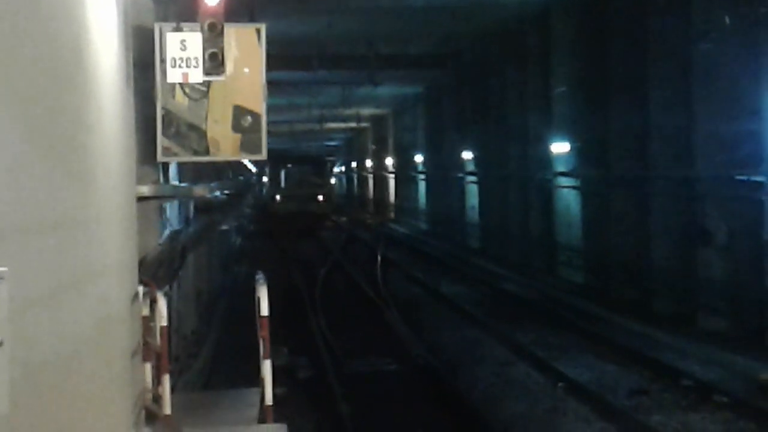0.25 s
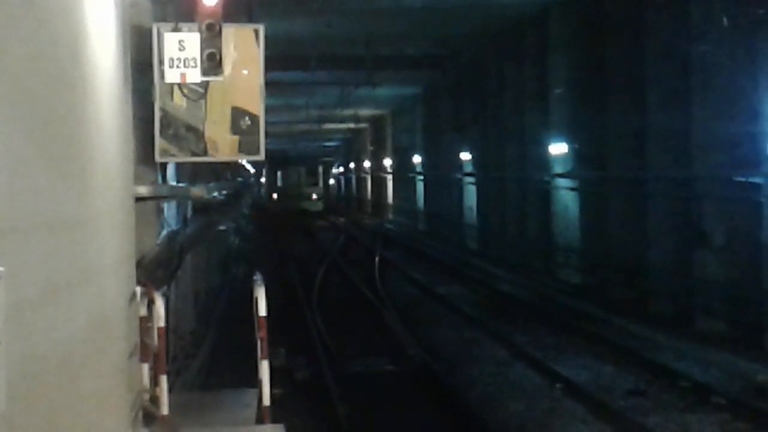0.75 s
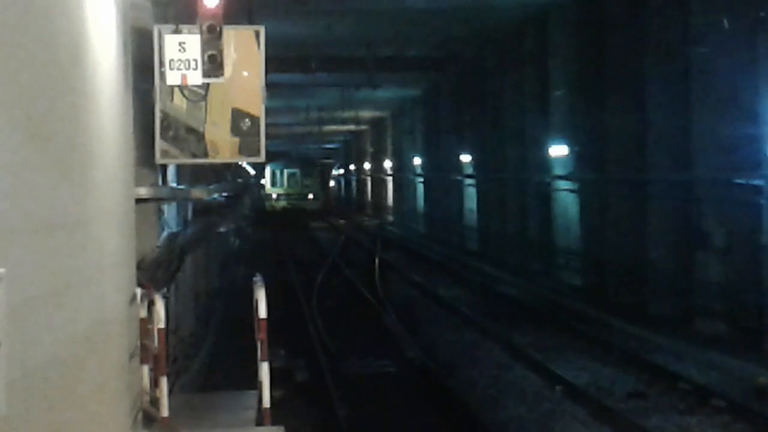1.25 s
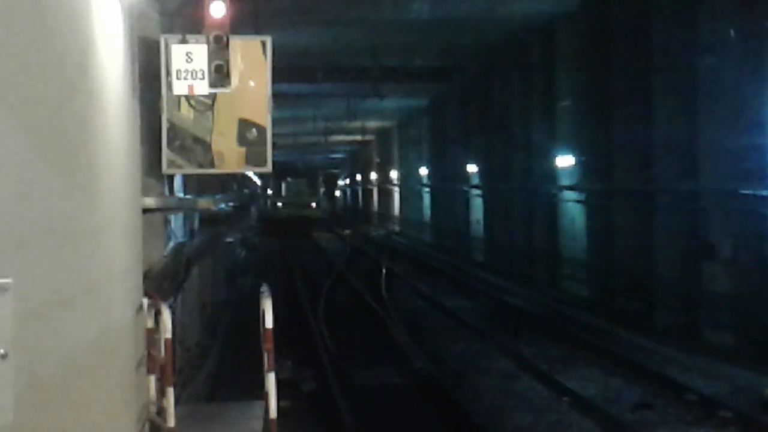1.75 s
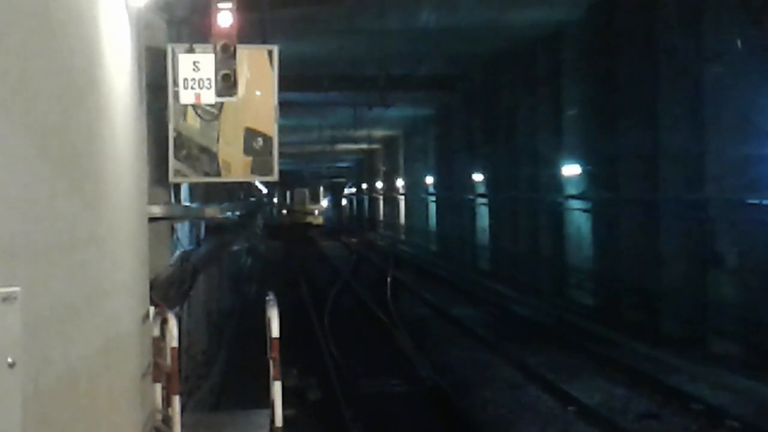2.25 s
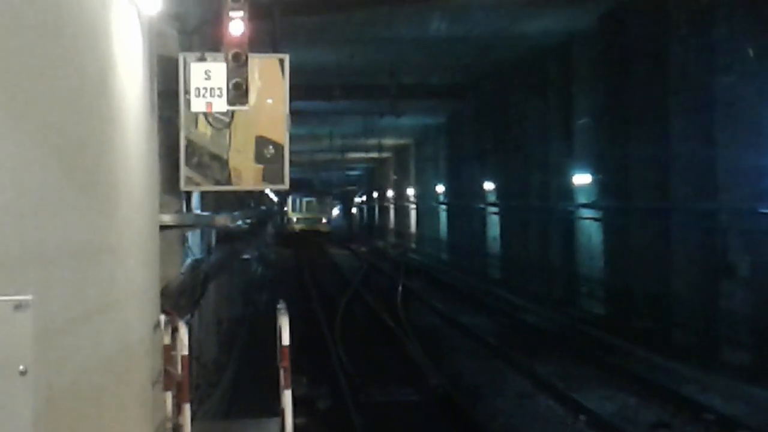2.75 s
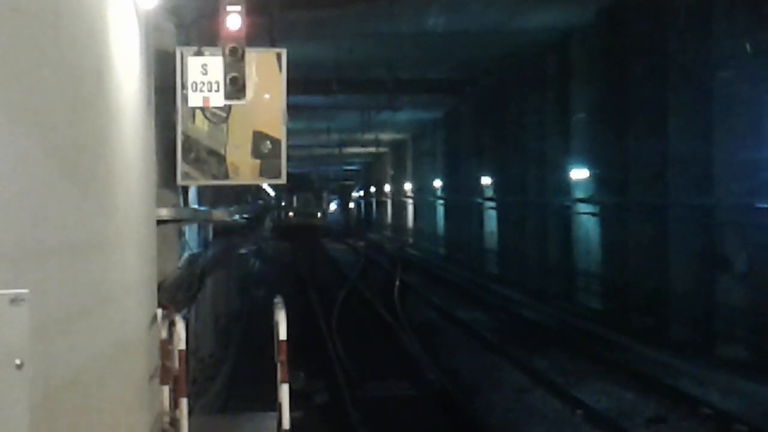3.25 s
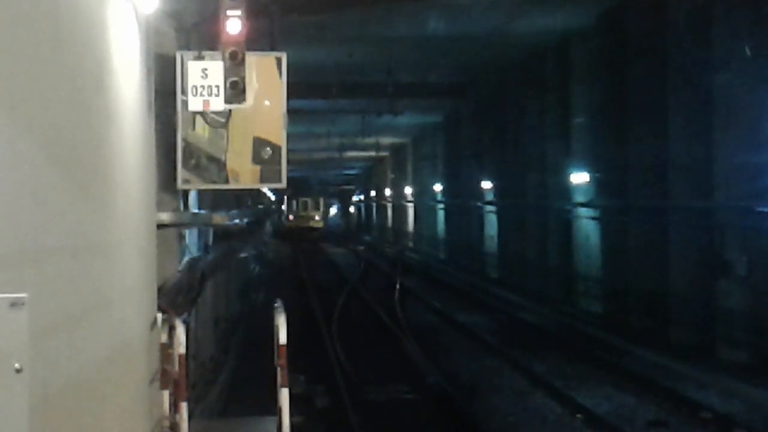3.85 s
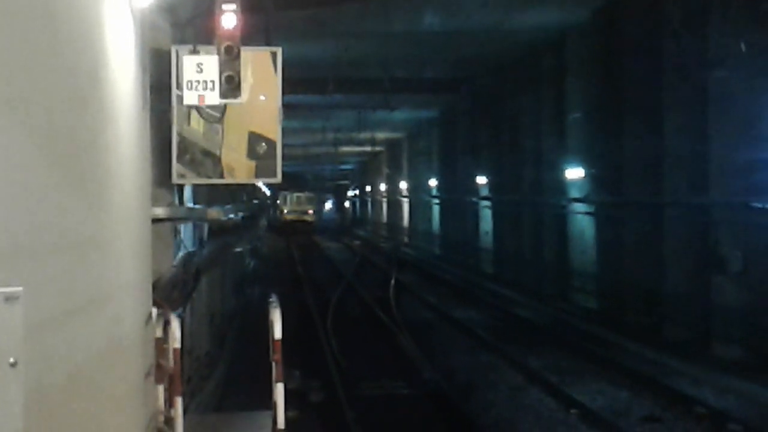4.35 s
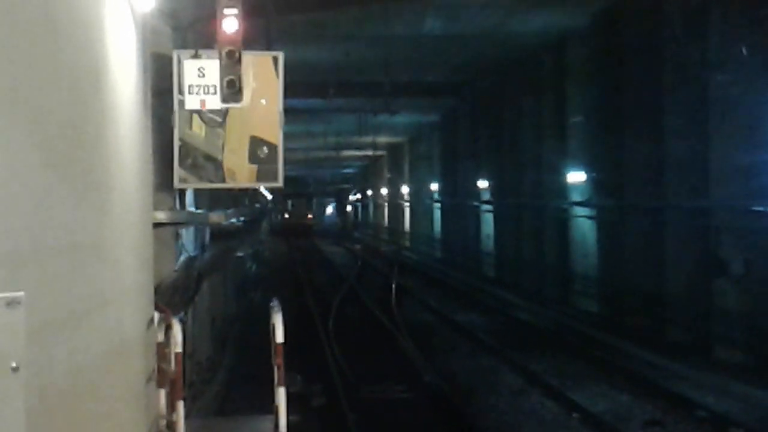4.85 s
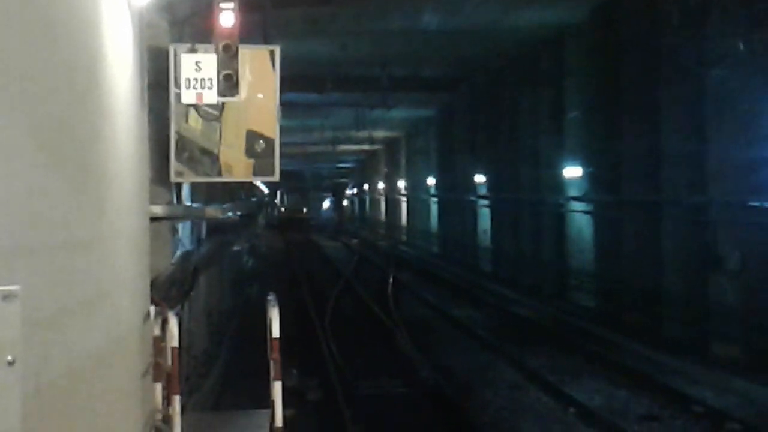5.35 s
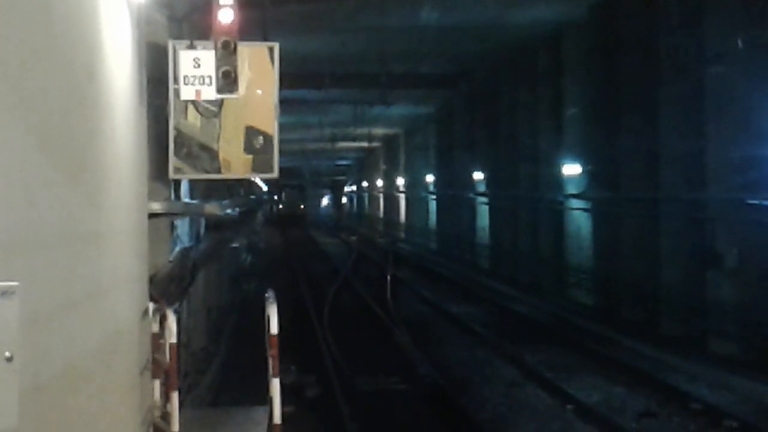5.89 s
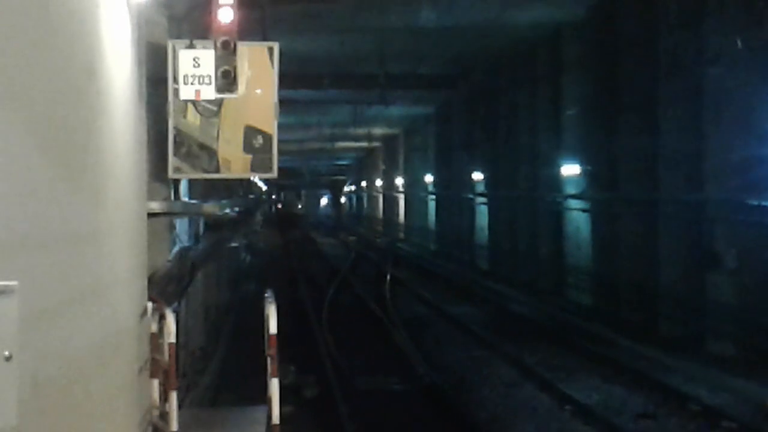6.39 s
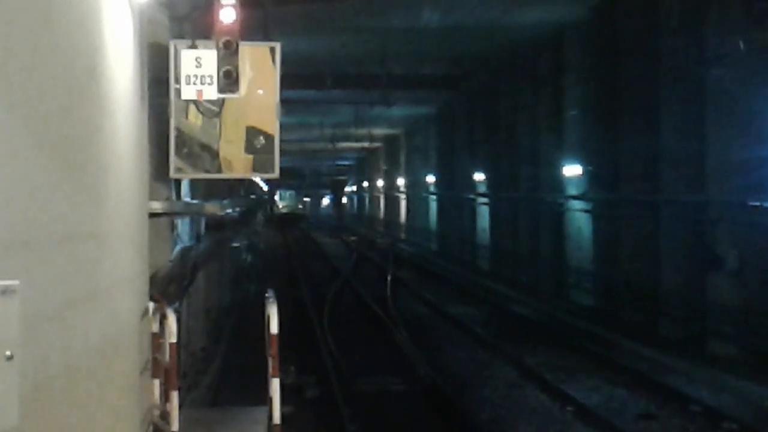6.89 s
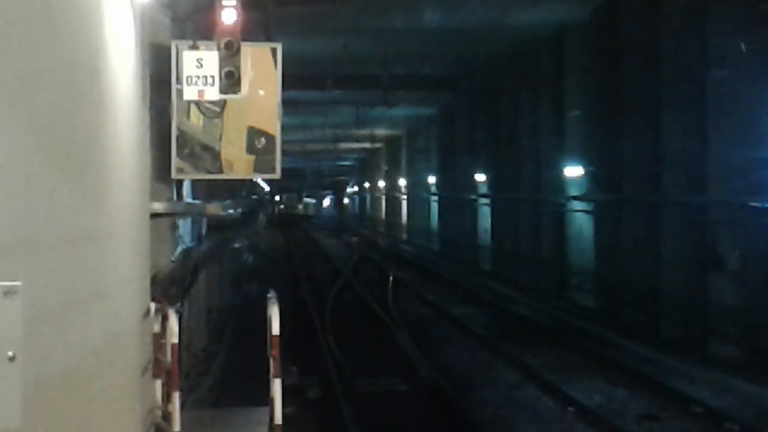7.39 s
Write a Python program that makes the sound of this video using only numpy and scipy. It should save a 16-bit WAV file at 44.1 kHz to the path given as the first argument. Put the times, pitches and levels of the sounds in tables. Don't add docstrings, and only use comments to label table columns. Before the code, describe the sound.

Departing metro train heard from the platform end: deep rolling rumble, early joint thuds, later swells over points, gradually receding into the tunnel.

```python
import sys
import numpy as np
from scipy import signal
from scipy.fft import rfft, irfft, next_fast_len
from scipy.io import wavfile
from scipy.ndimage import uniform_filter1d, map_coordinates

SR = 44100
rng = np.random.default_rng(int(sys.argv[2]) if len(sys.argv) > 2 else 0)


def unload_wav(signal):
    wavfile.write(
        sys.argv[1],
        SR,
        np.round(np.clip(np.atleast_2d(signal).T, -1, 1) * 32767).astype(np.int16),
    )


def natural_amplitude(level_db):
    exponent = np.asarray(level_db, float) / 20
    return 10 ** exponent


N = 336302

# frequency in Hz, level in dB.
VENTILATION_SPECTRUM = [(12, -45.5), (20, -18), (38, -17), (102, 2.5), (168, -12), (221, 0.5), (259, -6),
                        (446, -11), (964, -31.5), (1160, -32), (4500, -51), (5850, -90.5), (9900, -120)]
# frequency in Hz, level in dB.
GROUND_SPECTRUM = [(8.8, -51), (15, -21), (48, -6), (75, -6.5), (98, -24), (160, -120)]
# frequency in Hz, level in dB.
HISS_SPECTRUM = [(2000, -23), (3500, -13.5), (4600, -4.5), (5500, -4), (6500, -2), (7700, 1), (11000, 0.5),
                 (15000, 1)]
# frequency in Hz, level in dB.
WHINE_TONES = [(14002, -90.5)]
# frequency in Hz, width in Hz, level in dB.
FLOOR_MODES = [(86.2, 18, -6), (99, 16, -10.5), (116, 17, 2)]
# frequency in Hz, width in Hz, level in dB.
BOGIE_MODES = [(137.1, 14, -1), (159, 17.6, 0.5), (176.6, 20, -4.5), (200, 20.5, -2.5)]
# frequency in Hz, width in Hz, level in dB.
RAIL_MODES = [(217.8, 15, -0.5), (241.2, 24, -1.5), (275.5, 24, -4), (296, 20, -3.5)]
# frequency in Hz, width in Hz, level in dB.
WHEEL_MODES = [(350.6, 78, 1), (423.4, 89, -0.5), (520.4, 117, -3), (579, 33, -10.5)]
# modes (frequency in Hz, width in Hz, level in dB),
# level in dB, fall in dB per s.
NEAR_RAIL = ([(246.2, 10, 0)], -32.5, 6)
# frequency in Hz, level in dB.
ROAR_SPECTRUM = [(360, -27.5), (620, -0.5), (735, -1.5), (852, -5.5), (911, -9), (1030, -10.5),
                 (1220, -20.5), (1500, -26.5), (1950, -53), (3300, -120)]
# frequency in Hz, level in dB.
RUSH_SPECTRUM = [(760, -31), (1300, -2), (1710, -4), (1880, -3.5), (3600, -24), (4680, -56), (7920, -120)]
# centre in seconds, half length in seconds, swell in dB, centre in Hz.
POINTS_SWELLS = [(0.264, 0.054, 5.5, 252), (0.3, 0.17, 2, 400), (0.53, 0.11, 5.5, 210),
                 (1.007, .05, 6, 189), (1.1, .05, 5, 60), (1.374, 0.069, 3.5, 183.6),
                 (1.617, 0.073, 1.5, 160), (2.34, 0.13, 1, 160), (3.194, .08, -5.5, 150),
                 (3.99, 0.12, 3, 140), (4.24, 0.14, 10, 106), (4.47, 0.088, 2, 270),
                 (4.702, 0.052, 4.5, 140), (4.98, 0.21, 11.5, 120), (5.2, .06, 11, 55.56),
                 (5.4, 1.8, 2.5, 390), (5.65, .08, 12, 80), (5.63, .06, 4, 170), (5.856, 0.18, 6, 139),
                 (5.947, 0.2, 4, 420), (6.4, 0.41, 3.5, 210), (6.8, .2, 4, 110), (6.85, .2, 2, 140)]
# centre in seconds, half length in seconds, swell in dB.
SHOE_BRUSHES = [
    (0.79, 0.017, 4),
    (1.64, 0.022, 6),
    (6.755, .012, 9),
    (6.83, 0.07, 5.5),
    (7.123, 0.063, 4.5),
]
# start in seconds, peak in dB, pitch in Hz.
JOINT_THUDS = [(0.411, -23, 229), (0.457, -6.5, 230), (0.545, -14.5, 147), (0.606, -13.5, 170),
               (0.781, -8.5, 229), (0.979, -20, 152), (1.036, -7, 182), (4.309, -14, 125),
               (4.828, -11, 141), (4.959, -35, 116), (5.032, -11, 118), (5.8, -10, 159),
               (5.851, -11.5, 168), (5.99, -12, 147)]
# frequency in Hz, time to decay 60 dB in seconds.
TUNNEL_DECAY = [(80, 1), (300, 0.54), (1000, 0.41)]
# (frequency in Hz, width in Hz, level in dB).
FLANGE_SCRAPE = (5.775, .012, -61, [(1350, 300, 0), (1700, 300, 0)])

START_M, SPEED_M_S = 42, 23.4
REACH_OCT = 0.48
PILLARS_S, PILLARS_HALF_S, PILLARS_DB = 3.74, 0.68, 5.5
HISS_TOP_HZ = 15745


def unit(x):
    return x / np.sqrt(np.mean(x ** 2) + 1e-20)


def along(points, hz):
    f, v = np.transpose(points)
    return np.interp(np.log(hz + 1), np.log(f + 1), v)


def wobble(rate):
    knots = rng.standard_normal(int(N * rate / SR) + 4)
    return map_coordinates(knots, [np.arange(N) * rate / SR])


def bump(s, half):
    return np.exp(-((np.arange(N) / SR - s) / half) ** 2)


def noise(response):
    m = next_fast_len(N + SR)
    white = rfft(rng.standard_normal(m))
    return unit(irfft(white * response(np.fft.rfftfreq(m, 1 / SR)), m)[:N])


def coloured(spectrum):
    return noise(lambda hz: natural_amplitude(along(spectrum, hz)))


def resonant(modes, steep):
    def response(f):
        power = 0
        for centre, width, db in modes:
            damping = (f * width) ** 2
            resonance = damping / ((centre * centre - f * f) ** 2 + damping)
            power = power + natural_amplitude(2 * db) * resonance ** steep
        return np.sqrt(power) / (1 + (f / 1900) ** 4)

    x = noise(response)
    swell = uniform_filter1d(x ** 2, size=SR // 12)
    swell = np.abs(uniform_filter1d(swell, size=SR // 12))
    return unit(x / (swell + 0.04) ** 0.35)


def heard(start_db, spread, air_db_per_m, hz):
    metres = SPEED_M_S * np.arange(N) / SR
    swells = 0
    for s, half, db, centre in POINTS_SWELLS:
        coupling = np.exp(-(np.log2(centre / hz) / REACH_OCT) ** 2)
        swells = swells + db * coupling * bump(s, half)
    spreading = spread * 20 * np.log10(1 + metres / START_M)
    return start_db - spreading - air_db_per_m * metres + swells


def station():
    hum = natural_amplitude(-42.5) * coloured(VENTILATION_SPECTRUM)
    rumble_db = heard(-48.5, 0.5, 0.005, 50) + 0.8 * wobble(2.6)
    return hum + natural_amplitude(rumble_db) * coloured(GROUND_SPECTRUM)


def microphone_hiss():
    return natural_amplitude(-69.5) * noise(lambda hz: natural_amplitude(along(HISS_SPECTRUM, hz)) * (hz < HISS_TOP_HZ))


def electronic_whine():
    drift = 0.004 * np.cumsum(rng.standard_normal(N))
    t = np.arange(N) / SR
    return sum(natural_amplitude(db - 1) * np.sin(2 * np.pi * hz * t + drift) for hz, db in WHINE_TONES)


def rolling():
    floor_db = heard(-33.5, 0.72, 0.0026, 140) + 0.26 * wobble(8.2)
    floors = natural_amplitude(floor_db) * resonant(FLOOR_MODES, steep=1.67)
    bogie_db = heard(-26, 0.73, 0.0041, 165) + 0.33 * wobble(9.9)
    bogies = natural_amplitude(bogie_db) * resonant(BOGIE_MODES, steep=1.57)
    rail_db = heard(-28.5, 1.04, 0.0018, 250) + 1.6 * wobble(11)
    rails = natural_amplitude(rail_db) * resonant(RAIL_MODES, steep=1.7)
    wheel_db = heard(-31.5, 0.99, 0.001, 340) + 0.54 * wobble(12)
    wheels = natural_amplitude(wheel_db) * resonant(WHEEL_MODES, steep=1.89)
    return floors + bogies + rails + wheels


def near_rail():
    modes, db, fall_db = NEAR_RAIL
    return natural_amplitude(db - fall_db * np.arange(N) / SR) * resonant(modes, steep=2.84)


def roar():
    t = np.arange(N) / SR
    screening_db = PILLARS_DB * (1 + np.tanh((t - PILLARS_S) / PILLARS_HALF_S)) / 2
    brush_db = sum(db * bump(s, half) for s, half, db in SHOE_BRUSHES)
    level_db = heard(-42.5, 0.11, 0.045, 800) - screening_db + brush_db
    return natural_amplitude(level_db + 0.23 * wobble(6.8)) * coloured(ROAR_SPECTRUM)


def rush():
    level_db = heard(-60.5, 0.27, 0.06, 1700) + 0.4 * wobble(3.5)
    return natural_amplitude(level_db) * coloured(RUSH_SPECTRUM)


def joints():
    thuds = np.zeros(N + SR)
    t = np.arange(SR // 4) / SR
    envelope = natural_amplitude(-60 * t / 0.039) * (1 - np.exp(-t / 0.0072))
    for s, db, hz in JOINT_THUDS:
        thuds[round(s * SR):][:len(t)] += natural_amplitude(db + 0.5) * envelope * np.sin(2 * np.pi * hz * t)
    thuds = thuds[:N + SR]
    hz, frame_s, z = signal.stft(rng.standard_normal(SR), SR, nperseg=1024)
    decay = natural_amplitude(-60 * frame_s / along(TUNNEL_DECAY, hz)[:, None])
    tail = signal.istft(z * decay, SR, nperseg=1024)[1]
    tail = tail / np.linalg.norm(tail)
    return thuds[:N] + natural_amplitude(-4.5) * signal.fftconvolve(thuds, tail)[:N]


def flange_scrape():
    s, half, db, modes = FLANGE_SCRAPE
    return natural_amplitude(db) * bump(s, half) * resonant(modes, steep=1.6)


def scene():
    train = rolling() + near_rail() + roar() + rush() + joints() + flange_scrape()
    return (station() + train)[None]


def band_limit(x):
    return signal.sosfilt(signal.butter(12, 17080, fs=SR, output="sos"), x)


def record(dry):
    offset = -0.0006
    mix = dry + microphone_hiss() + electronic_whine() + offset
    return band_limit(mix)


dry = scene()
out = record(dry)
unload_wav(out)
```